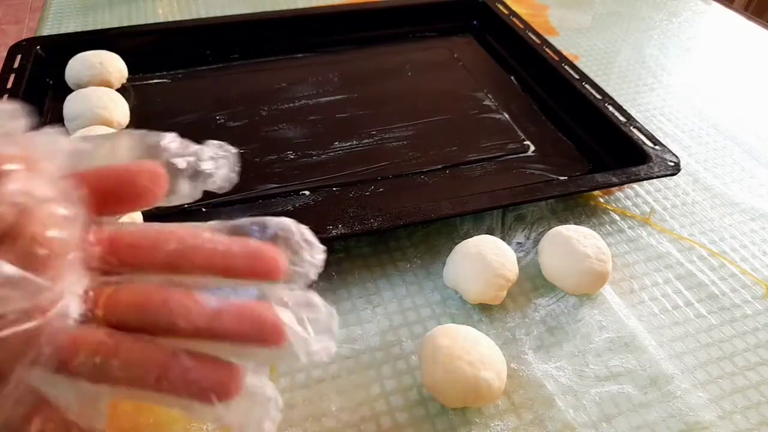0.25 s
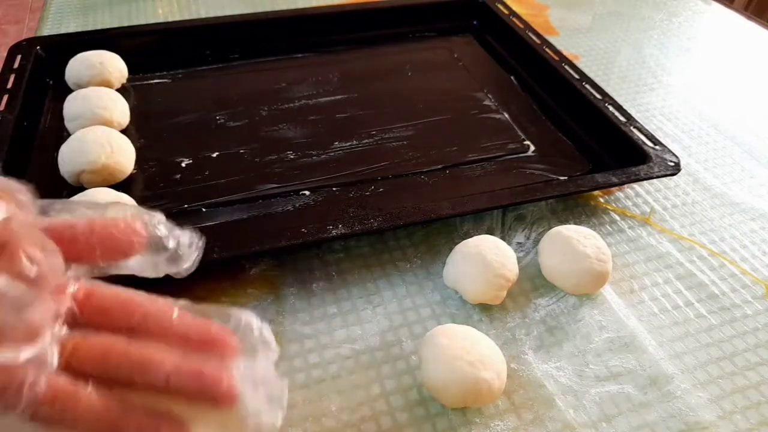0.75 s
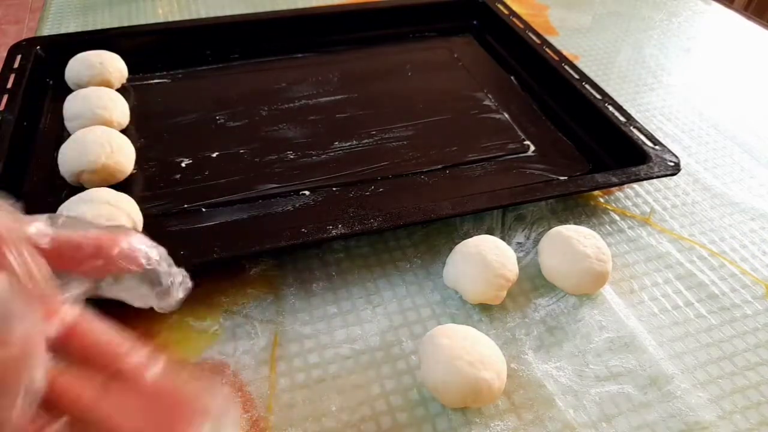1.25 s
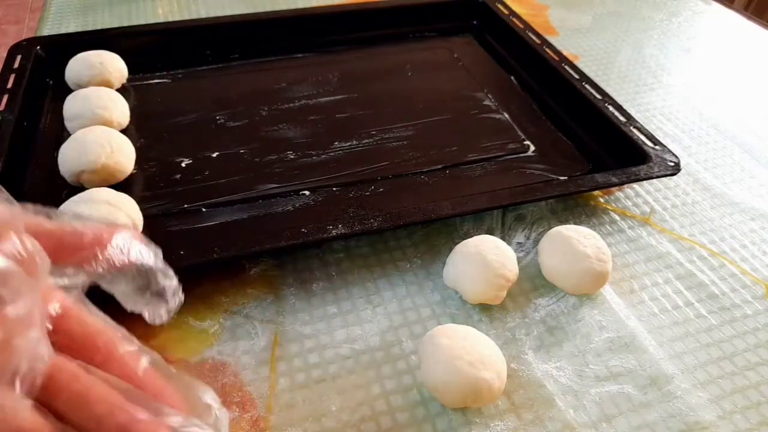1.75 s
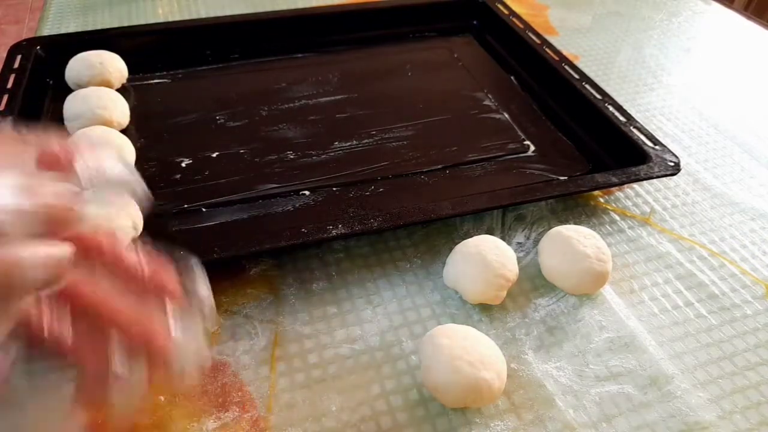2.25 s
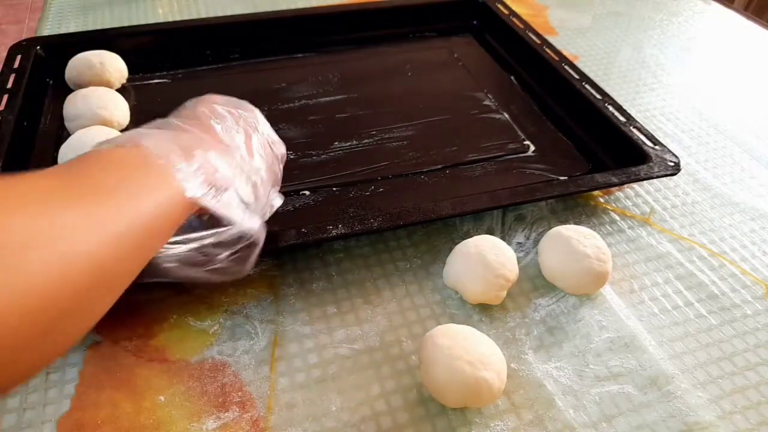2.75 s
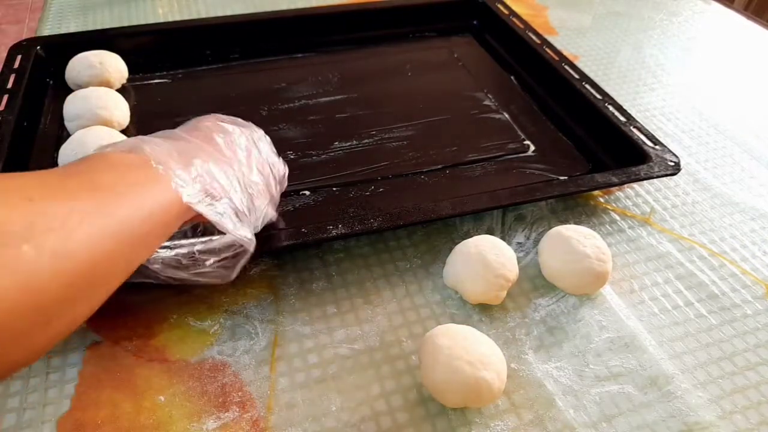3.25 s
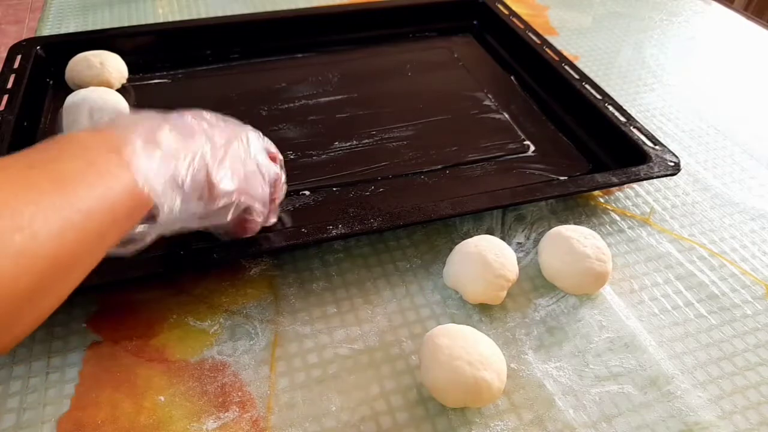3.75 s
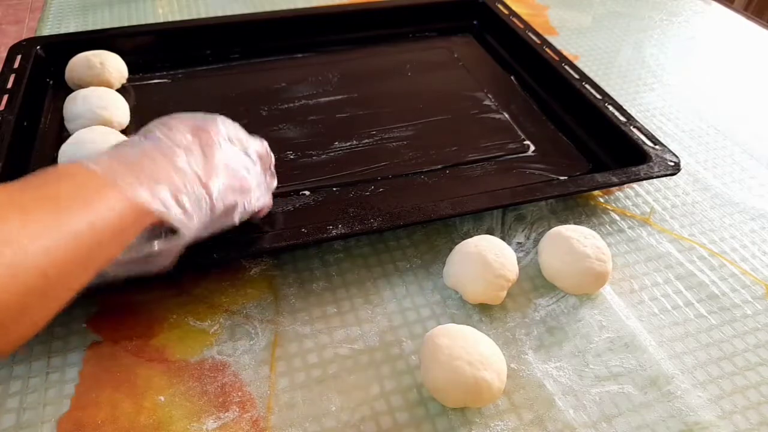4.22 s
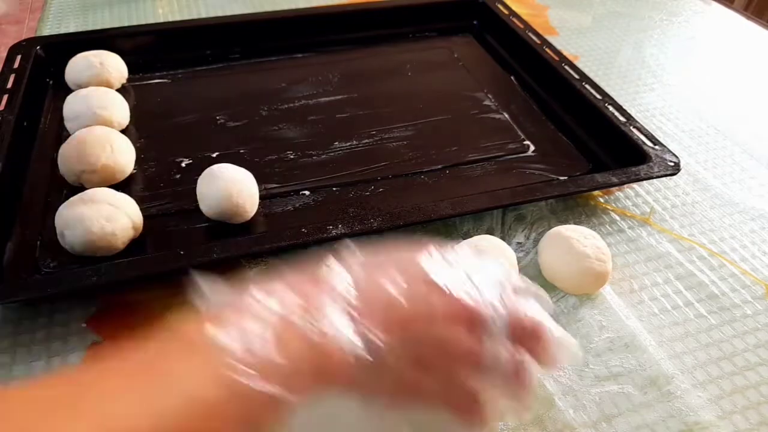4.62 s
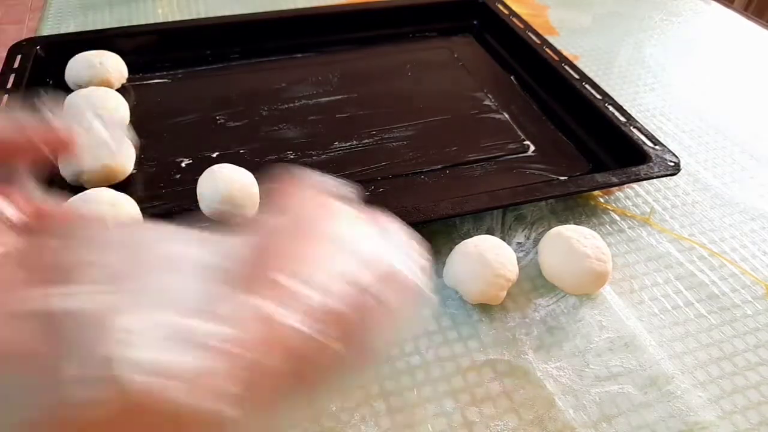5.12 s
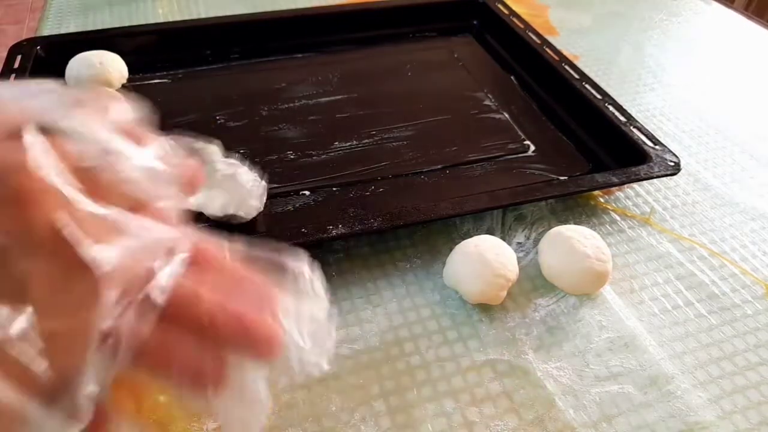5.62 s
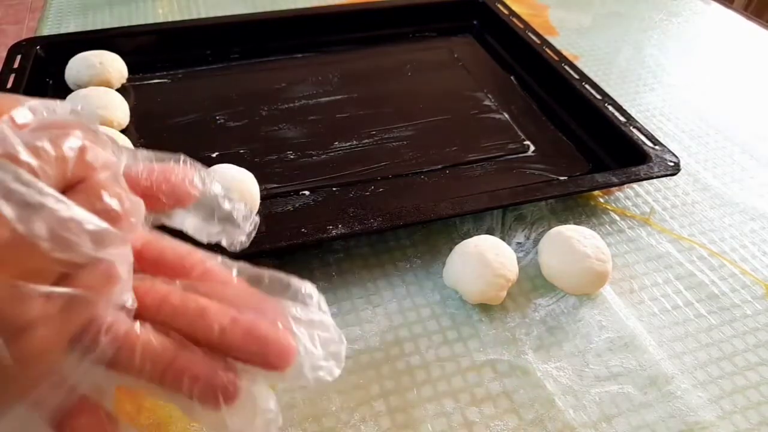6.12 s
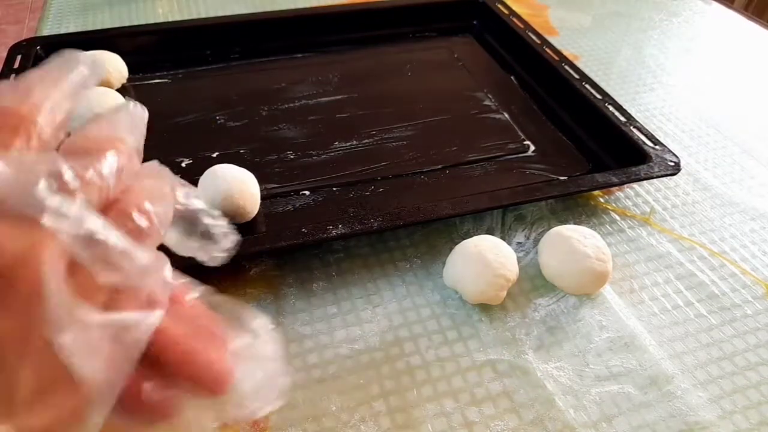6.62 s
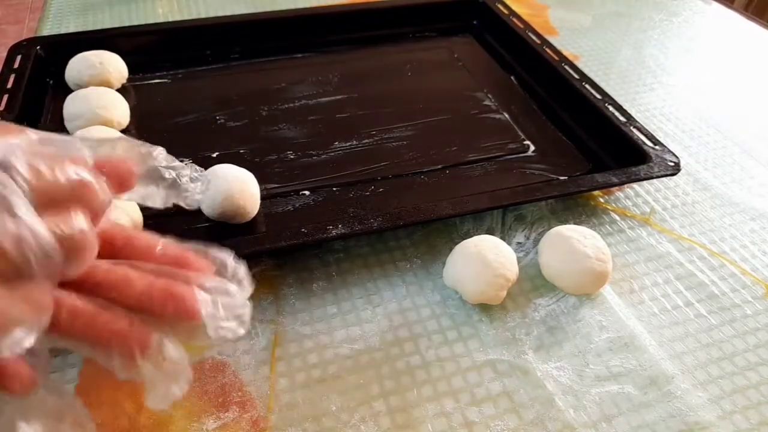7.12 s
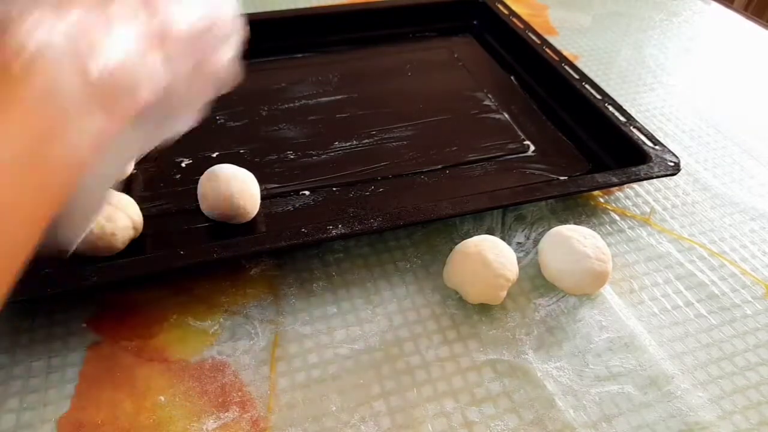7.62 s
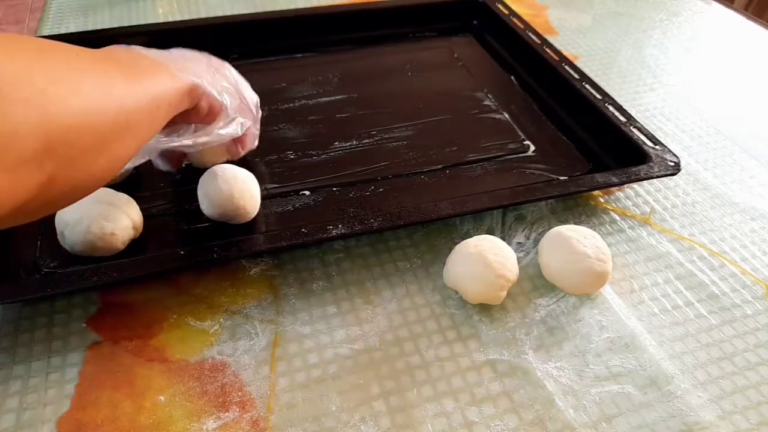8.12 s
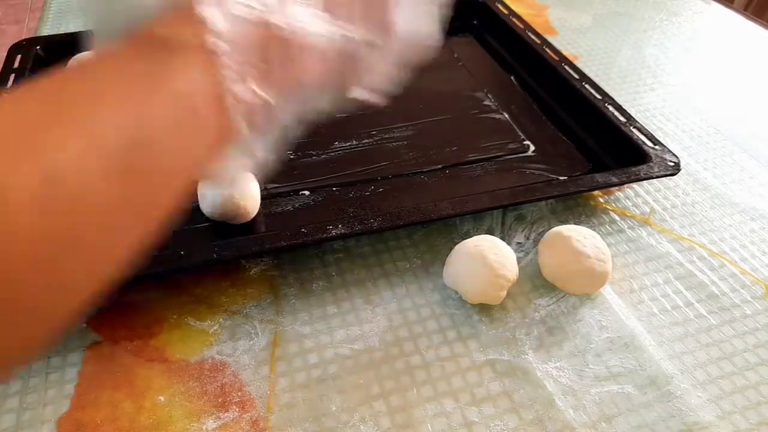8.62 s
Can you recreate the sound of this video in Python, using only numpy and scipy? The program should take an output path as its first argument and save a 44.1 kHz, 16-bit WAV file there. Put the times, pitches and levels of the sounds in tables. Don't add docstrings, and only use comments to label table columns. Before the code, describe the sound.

Close to a stereo microphone in a kitchen, loose thin plastic gloves rustle briskly as palms roll a dough ball, with sharp crease pops. The crackle drops to faint lone ticks while the ball is set down, then a soft dull pat starts a second bout of rustling, which fades to sparse ticks again. A low fan hum and soft blown air continue throughout.

```python
import sys
import numpy as np
from scipy import signal
from scipy.fft import rfft, irfft
from scipy.io import wavfile
from scipy.ndimage import uniform_filter1d

SR = 44100
rng = np.random.default_rng(int(sys.argv[2]) if len(sys.argv) > 2 else 0)


def dump(signal):
    limited = np.clip(np.atleast_2d(signal).T, -1, 1)
    pcm = np.round(limited * 32767).astype(np.int16)
    wavfile.write(sys.argv[1], SR, pcm)


def voltage_ratio(decibels):
    exponent = np.asarray(decibels, float) / 20
    return 10 ** exponent


N = 391166

RIGHT_LAG = 14


def rms_one(x):
    return x / np.sqrt(np.mean(x ** 2) + 1e-20)


def in_time(rows):
    s, *columns = np.transpose(rows)
    return [np.interp(np.arange(N) / SR, s, column) for column in columns]


def at_hz(points, hz):
    table_hz, value = np.transpose(points)
    return np.interp(np.log(hz), np.log(table_hz), value)


def drift(rate):
    r = np.exp(-80 * np.pi * rate / SR)
    slow = signal.lfilter([1], [1, -2 * r, r * r], rng.standard_normal(N // 40 + 2002))[2000:]
    return np.interp(np.arange(N) / 40, np.arange(len(slow)), rms_one(slow))


def coloured(x, spectrum):
    hz = np.maximum(np.fft.rfftfreq(2048, 1 / SR), 1)
    cepstrum = irfft(np.log(voltage_ratio(at_hz(spectrum, hz))))
    cepstrum[1:1024] *= 2
    response = irfft(np.exp(rfft(cepstrum[:1024], 2048)))
    return signal.fftconvolve(x, response[None], axes=1)[:, :N]


def band_pass(x, low_hz, high_hz):
    return signal.sosfilt(signal.butter(2, [low_hz, high_hz], "band", fs=SR, output="sos"), x)


def spread(db):
    return voltage_ratio(np.array([db / 2, -db / 2]))


# f/Hz, likeness/1
PORT_LIKENESS = [(60, 1), (130, 0.99), (290, 0.92), (500, .62), (900, 0.39), (1600, 0.31), (3000, 0.043)]


def at_two_ports(common, left, right, hz):
    alike = np.clip(at_hz(PORT_LIKENESS, hz), 0, 1)
    shared = np.array([common, np.roll(common, RIGHT_LAG)])
    own = np.array([left, right])
    return (np.sqrt(alike) * shared + np.sqrt(1 - alike) * own)[:, -N:]


# f/Hz, left-right/dB
FAR_PAN = [(60, -4.5), (200, -1.5), (500, 0), (15000, -3)]


def far_pan(hz):
    return spread(at_hz(FAR_PAN, hz))[:, None]


# f/Hz, density/dB per Hz
AIR_COLOUR = [(25, -12), (50, -5), (90, -1), (170, -9.5), (380, -10), (510, -15), (750, -10), (1100, -10.5),
              (1600, -14.5), (2300, -19), (3100, -22.5), (6500, -28), (8600, -63), (12500, -66.5)]
AIR_OVER_HUM_DB = -10.5


def air():
    out = 0
    edges = 22 * 2 ** np.arange(0, 9.6, .5)
    white = rng.standard_normal((2, 3, N + 4000))
    for k, (low, high) in enumerate(zip(edges, edges[1:])):
        common, left, right = band_pass(white[k % 2], low, high)
        hz = np.sqrt(low * high)
        gain = voltage_ratio(at_hz(AIR_COLOUR, hz) + 0.77 * drift(4)) * far_pan(hz)
        out = out + gain * at_two_ports(common, left, right, hz)
    return voltage_ratio(AIR_OVER_HUM_DB) * rms_one(out)


# f/Hz, width/Hz, level over the hum/dB
AIR_COLUMNS = [(139.6, 7.3, -24.5), (163.3, 5.6, -21), (244.7, 9.1, -27), (301, 20, -22), (328, 9.6, -30),
               (369, 12, -22), (412.6, 19, -27), (556.3, 20, -26), (723, 76, -20.5), (957, 44, -26),
               (1103, 56, -39), (2400, 310, -26)]


def room_modes():
    out = 0
    for hz, width_hz, level_db in AIR_COLUMNS:
        r = np.exp(-np.pi * width_hz / SR)
        resonance = [1, -2 * r * np.cos(2 * np.pi * hz / SR), r * r]
        common, left, right = signal.lfilter([1, 0, -1], resonance, rng.standard_normal((3, N + 9000)))
        ringing = rms_one(at_two_ports(common, left, right, hz))
        out = out + voltage_ratio(level_db) * far_pan(hz) * ringing
    return out


# multiple/1, level over the hum/dB, wander/dB
FAN_TURN = (66.92, [(1, 0, .3), (2, -31, 3), (3, -20, .8), (4, -29, 2), (5, -29, 2), (6, -31, 2),
            (7, -32, 3)])
# f/Hz, level over the hum/dB, wander/dB
MOTOR_TONES = [(57.1, -25, -7), (58.7, -25, -1), (109.1, -12, 1.8), (115.7, -20, 2.5), (118.4, -23, 0),
               (219, -28.5, 2), (235.6, -29.5, 1), (249.3, -29, 2), (327.5, -31.5, 6)]


def machines():
    t = np.arange(N + RIGHT_LAG) / SR
    turn_hz, harmonics = FAN_TURN
    fan_tones = [(turn_hz * k, level_db, wander_db) for k, level_db, wander_db in harmonics]
    out = np.zeros((2, N))
    for hz, level_db, wander_db in fan_tones + MOTOR_TONES:
        tone = np.sqrt(2) * np.sin(2 * np.pi * (hz * t + rng.random()))
        gain = voltage_ratio(level_db + wander_db * drift(1.86)) * far_pan(hz)
        out += gain * np.array([tone[RIGHT_LAG:], tone[:N]])
    return out


# t/s, hum/dB
HUM = [(0.0, -31.5), (0.17, -31), (2.35, -31), (2.57, -32.5), (2.99, -32), (4.42, -32.5), (4.86, -31.5),
       (5.34, -32.5), (5.58, -30.5), (6.03, -31.5), (7.29, -31.5), (8.0, -32.5), (8.77, -32), (8.87, -31.5)]


def kitchen():
    hum_db, = in_time(HUM)
    return voltage_ratio(hum_db) * (machines() + air() + room_modes())


# f/Hz, density/dB per Hz
FILM_COLOUR = [(600, -19), (1000, -13), (1500, -12), (1950, -7.5), (2450, -2), (3250, -4.5), (4100, -2.5),
               (6300, -0.5), (7500, -0.5), (8500, -5.5), (9800, -4.5), (11800, 1), (13500, -0.5),
               (15500, -6.5)]


def kitchen_echo(level, t60):
    keep = voltage_ratio(-120 / (t60 * SR))
    power = signal.lfilter([1 - keep], [1, -keep], level ** 2)
    return np.sqrt(power) * rms_one(coloured(rng.standard_normal((2, N)), FILM_COLOUR))


def burst(x, t60):
    keep = voltage_ratio(-60 / (t60 * SR))
    return signal.lfilter([1], [1, -keep], x + 1e-18) * rng.standard_normal(x.shape)


# t/s, level/dB
PALM_PAT = (4.718, -36.5)


def grab():
    s, level_db = PALM_PAT
    touch = np.zeros((2, N))
    touch[:, int(s * SR)] = voltage_ratio(level_db + 11.5)
    return band_pass(burst(touch, t60=0.22), 800, 7000)


# peak t/s, film/dB,
# swell/s per 10 dB, fade/s per 10 dB
ROLLING_STROKES = [(0.002, -40.6, 0.111, 0.037), (0.135, -37.2, 0.042, 0.155), (0.237, -33.8, 0.097, 0.072),
                   (0.448, -34.4, 0.069, 0.061), (0.541, -36.9, 0.024, 0.135), (0.601, -37.3, 0.074, 0.067),
                   (0.868, -36.9, 0.11, 0.081), (0.994, -45.0, 0.065, 0.151), (1.128, -34.7, 0.039, 0.278),
                   (1.375, -39.1, 0.073, 0.059), (1.526, -40.3, 0.044, 0.1), (1.695, -37.4, 0.27, 0.06),
                   (1.93, -39.2, 0.134, 0.044), (2.156, -38.1, 0.125, 0.186), (2.33, -38.6, 0.193, 0.05),
                   (4.724, -40.5, 0.011, 0.103), (4.777, -38.8, 0.018, 0.154), (4.975, -45.5, 0.198, 0.15),
               (5.375, -36.6, 0.013, 0.064), (5.523, -39.0, 0.113, 0.071), (5.626, -31.9, 0.042, 0.079),
               (5.755, -38.3, 0.086, 0.047), (5.966, -39.1, 0.226, 0.042), (6.104, -38.5, 0.2, 0.079),
               (6.312, -37.6, 0.037, 0.109), (6.409, -38.5, 0.038, 0.144), (6.616, -39.5, 0.047, 0.197),
               (6.781, -40.8, 0.054, 0.312), (6.874, -35.3, 0.037, 0.03), (7.186, -42.4, 0.45, 0.1),
               (7.334, -39.9, 0.079, 0.099), (7.559, -43.0, 0.518, 0.048)]
# peak t/s, film/dB, swell/s per 10 dB, fade/s per 10 dB
SETTING_DOWN = [(2.551, -57.3, 0.126, 0.056), (2.617, -53.6, 0.063, 0.202), (2.928, -45.4, 0.036, 0.11),
                (3.22, -49.5, 0.209, 0.132), (3.428, -53.9, 0.022, 0.073), (3.5, -52.2, 0.045, 0.052),
                (3.577, -52.1, 0.018, 0.23), (3.683, -57.7, 0.057, 0.551), (3.778, -47.4, 0.026, 0.236),
                (4.011, -52.3, 0.077, 0.153), (4.098, -47.0, 0.063, 0.023), (4.313, -46.2, 0.065, 0.079),
                (4.457, -48.9, 0.033, 0.197), (4.554, -54.3, 0.018, 0.03), (5.178, -55.0, 0.188, 0.186),
                (7.636, -58.0, 0.04, 0.03), (7.769, -54.9, 0.078, 0.046), (7.87, -54.7, 0.049, 0.107),
                (8.035, -54.3, 0.092, 0.143), (8.192, -48.6, 0.027, 0.07), (8.359, -48.0, 0.033, 0.056),
                (8.655, -48.1, 0.086, 0.176), (8.87, -46.8, 0.162, 0.125)]


def film_movement(rest_db):
    t = np.arange(0, N, 64) / SR
    power = voltage_ratio(2 * rest_db[::64])
    for s, db, swell, fade in ROLLING_STROKES + SETTING_DOWN:
        tens_of_db_below_peak = np.where(t < s, (s - t) / swell, (t - s) / fade)
        power = power + voltage_ratio(2 * (db - 10 * tens_of_db_below_peak))
    return np.interp(np.arange(N) / SR, t, 10 * np.log10(power))


def snaps(per_s, size_db, aim_db, lag):
    most = N // 5
    born = np.flatnonzero(rng.random(N) < per_s / SR)[:most]
    sign, aim, delay = rng.standard_normal((most, 3))[:len(born)].T
    strength = np.minimum(rng.exponential(1, most)[:len(born)], 5)
    size = voltage_ratio(size_db * strength) * np.sign(sign)
    right_born = np.clip(born + (lag * delay).astype(int), 0, N - 1)
    out = np.zeros((2, N))
    out[0, born] = size * voltage_ratio(aim_db * aim)
    np.add.at(out[1], right_born, size * voltage_ratio(-aim_db * aim))
    return rms_one(out)


# t/s, peak/dB, left-right/dB
ROLLING_POPS = [(0.0917, -24, 3.0), (0.1476, -20, 2.0), (0.1784, -20, 2.0), (0.2234, -19, 2.5),
                (0.4424, -19, 4.0), (0.4654, -19, 3.0), (0.5744, -20, 2.5), (0.6164, -20, 2.0),
                (0.8804, -21, 3.0), (1.1314, -17, 1.0), (1.1894, -20, 1.5), (1.6224, -21, 2.5),
                (1.6784, -23, 1.5), (2.1804, -23, 1.5), (4.7177, -23, -2.5), (4.7244, -23, -3.0),
                (4.7334, -26, -3.0), (4.7765, -19, -1.0), (4.7994, -20, -0.5), (5.3777, -20, 1.0),
                (5.5074, -21, 2.5), (5.6124, -17, 1.5), (5.7694, -26, 1.5), (6.0974, -25, 2.0),
                (6.4144, -22, 1.5), (6.6119, -19, 2.5), (6.7336, -22, 1.0), (6.8564, -20, 2.5),
                (7.5644, -27, 0.5), (7.5921, -29, 1.0)]
# t/s, peak/dB, left-right/dB
LONE_TICKS = [(2.6154, -34, 0.0), (2.6564, -30, 0.0), (2.7651, -34, -0.5), (2.8838, -32, -1.0),
              (2.9173, -27, 1.0), (2.9294, -27, -1.0), (2.9864, -29, -0.5), (3.0464, -31, -1.0),
              (3.1662, -33, 0.5), (3.2021, -30, 0.0), (3.2241, -29, 1.5), (3.5713, -32, 1.0),
              (3.6162, -31, 1.0), (3.7743, -31, 0.0), (3.7844, -29, 0.0), (3.8074, -30, 0.0),
              (3.9145, -33, 0.5), (4.0444, -33, 0.0), (4.0841, -29, 0.0), (4.1004, -32, -0.5),
              (4.2288, -33, -0.5), (4.3034, -29, 0.5), (4.3084, -27, -0.5), (4.3554, -32, -1.0),
              (4.4484, -34, 0.5), (4.4782, -26, 0.0), (4.5476, -32, -0.5), (4.6294, -34, -1.0),
              (4.6673, -34, -0.5), (4.6854, -34, -1.0),
              (5.1155, -32, -5), (5.1772, -33, 3), (7.7243, -38, 2), (7.7302, -39, 7), (7.7536, -39, 3),
                (7.7671, -36, 7), (7.7766, -36, 6), (7.8786, -35, 2), (8.0531, -37, 2), (8.1862, -30, 7),
                (8.1957, -32, 2), (8.2334, -35, 3), (8.3151, -35, 0), (8.3624, -32, 2), (8.5927, -32, 4),
                (8.6215, -34, -2), (8.7491, -32, 4), (8.8238, -31, -3)]
CHANCE_POPS = 110
LONE_GAIN = .33


def pops(film_db, pan_db):
    s, pop_db, pop_pan_db = np.transpose(ROLLING_POPS + LONE_TICKS)
    at = (s * SR).astype(int)
    size_chance, lean_chance = rng.standard_normal((CHANCE_POPS, 2)).T
    chance_at = rng.integers(0, N, CHANCE_POPS)
    over_rustle_db = pop_db - 5.5 - film_db[at] - LONE_GAIN * (film_db[at] + 40)
    pop = np.zeros((2, N))
    pop[:, chance_at] = voltage_ratio(12.0 + 2.5 * size_chance) * spread(3.0 + 3.0 * lean_chance)
    pop[:, at] = voltage_ratio(over_rustle_db) * spread(pop_pan_db - pan_db[at])
    return burst(pop, t60=.006) + voltage_ratio(-9) * burst(pop, t60=0.037)


# t/s, left-right/dB, film/dB
HAND_PATH = [(0.0, 3.0, -58.7), (1.0, 2.5, -53.6), (2.3, 2.0, -59.0), (2.76, -1.0, -66.0),
             (4.0, -0.5, -64.0), (4.62, -2.0, -65.4), (5.09, -2.5, -55.6), (5.32, 1.5, -58.9),
             (5.95, 2.0, -60.3), (7.5, 2.0, -60.2), (8.0, 0.0, -64.9), (8.45, -2.5, -65.8),
             (8.87, 2.0, -62.1)]
EFFORT_S = .3
DULL_WITH_EFFORT, DULL_WITH_STROKE = .26, -.2
BRIGHT_WITH_EFFORT, BRIGHT_WITH_STROKE = -.12, -.05


def gloves():
    pan_db, rest_db = in_time(HAND_PATH)
    film_db = film_movement(rest_db)
    moving_db = film_db + 43
    span = int(EFFORT_S * SR)
    effort_db = uniform_filter1d(film_db, span, origin=int(EFFORT_S * SR / 3)) + 43
    stroke_db = moving_db - effort_db
    clumps = voltage_ratio(3.0 * drift(60) + .8 * drift(15))
    busy = clumps * voltage_ratio(.3 * moving_db)
    small = voltage_ratio(-.07 * moving_db)
    whole = small * voltage_ratio(-3.0) * snaps(900 * busy, size_db=1.5, aim_db=-1, lag=9)
    slide = voltage_ratio(-3.0) * rng.standard_normal((2, N)) * np.sqrt(clumps)
    pop = pops(film_db, pan_db)
    dull_db = .7 + DULL_WITH_EFFORT * effort_db + DULL_WITH_STROKE * stroke_db
    bright_db = BRIGHT_WITH_EFFORT * effort_db + BRIGHT_WITH_STROKE * stroke_db
    edges_hz = [300, 2600, 4000, 5800, 8800, 12000, 18000]
    shares_db = [dull_db, dull_db, 0, 0, bright_db, bright_db]
    rustle = 0
    for low, high, share_db in zip(edges_hz, edges_hz[1:], shares_db):
        patch = voltage_ratio(1.6 * drift(30))
        folds = small * np.sqrt(patch) * snaps(1500 * busy * patch, size_db=2.1, aim_db=1.5, lag=9)
        rustle = rustle + band_pass(folds + whole + slide + pop, low, high) * voltage_ratio(share_db)
    level = voltage_ratio(film_db + 8.0)
    direct = rms_one(coloured(rustle, FILM_COLOUR)) * level * spread(pan_db)
    return direct + voltage_ratio(-8) * kitchen_echo(level, t60=0.17)


def scene():
    return kitchen() + grab() + gloves()


def top_cut(x):
    return signal.sosfilt(signal.butter(12, 16730, fs=SR, output="sos"), x)


TOP_HZ = 15520


def record(dry):
    rounded = .3 * np.tanh(dry / .3)
    low_pass = signal.ellip(12, .3, 70, TOP_HZ, fs=SR, output="sos")
    return top_cut(signal.sosfilt(low_pass, rounded))


dry = scene()
out = record(dry)
dump(out)
```